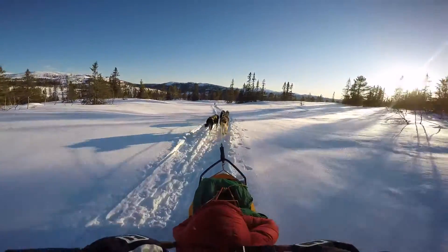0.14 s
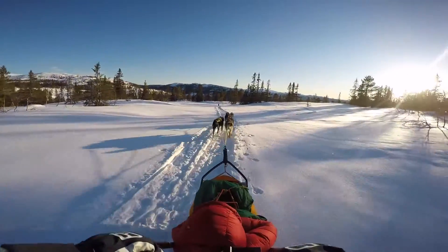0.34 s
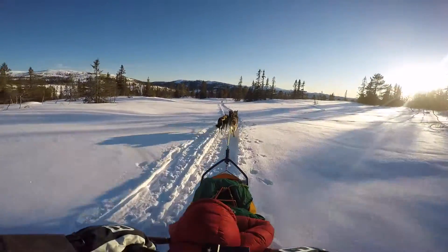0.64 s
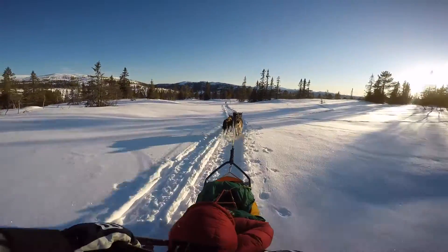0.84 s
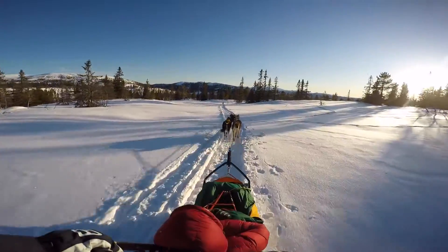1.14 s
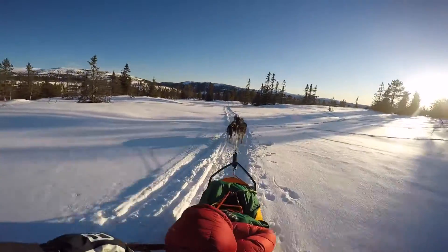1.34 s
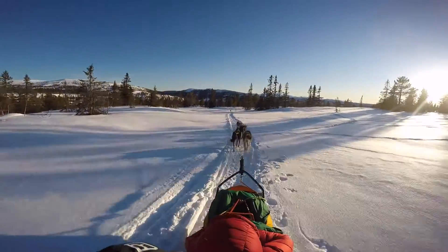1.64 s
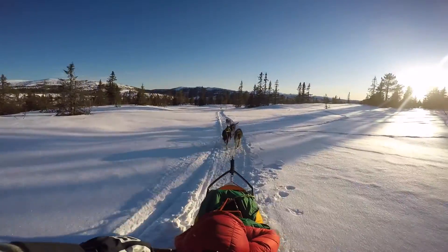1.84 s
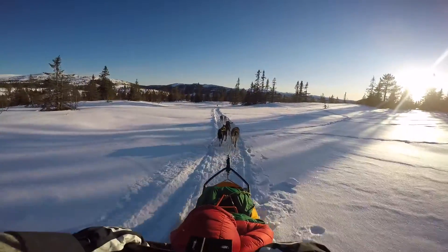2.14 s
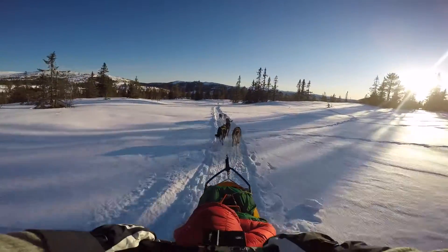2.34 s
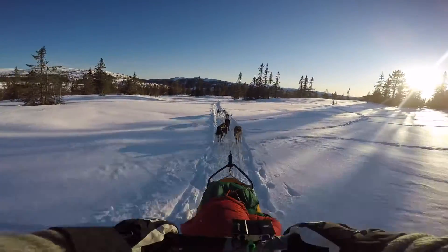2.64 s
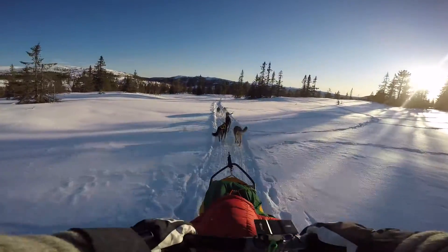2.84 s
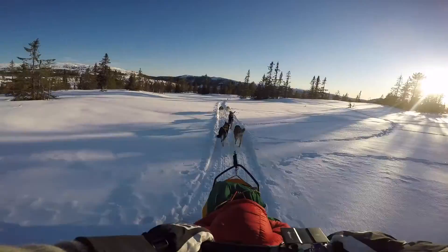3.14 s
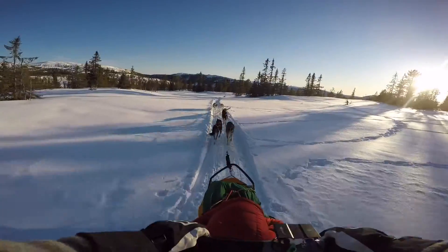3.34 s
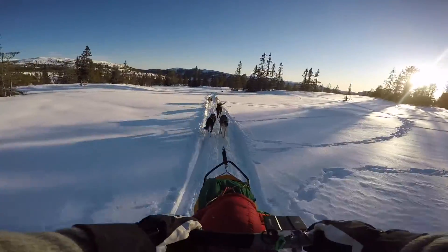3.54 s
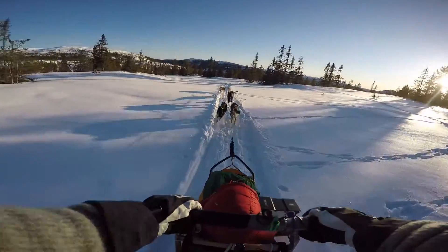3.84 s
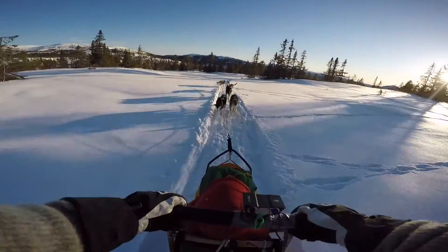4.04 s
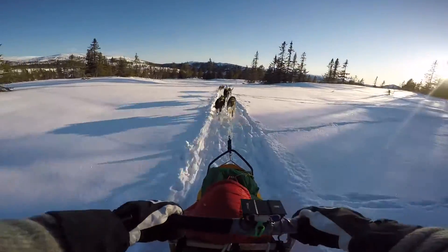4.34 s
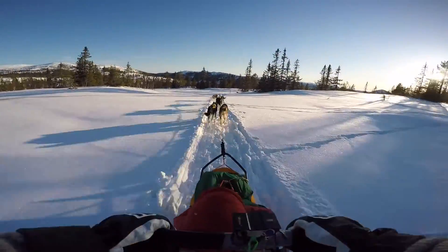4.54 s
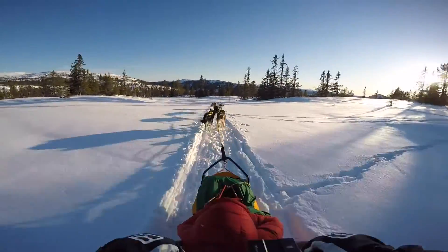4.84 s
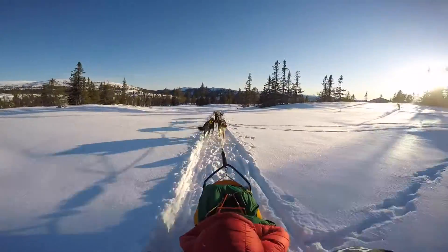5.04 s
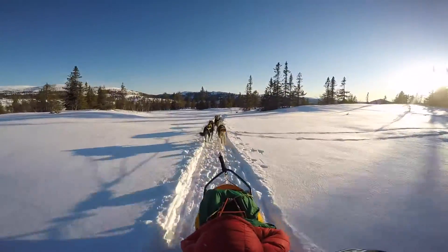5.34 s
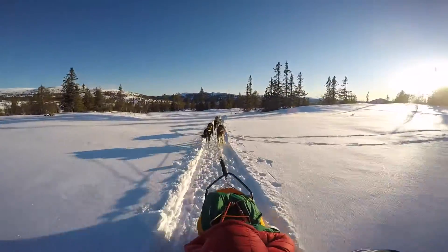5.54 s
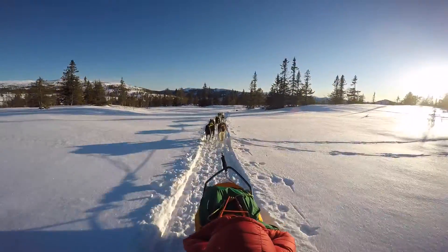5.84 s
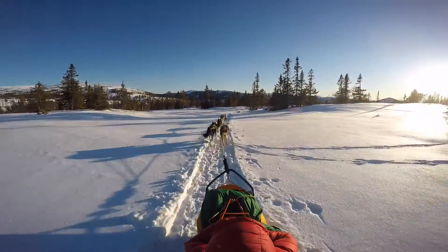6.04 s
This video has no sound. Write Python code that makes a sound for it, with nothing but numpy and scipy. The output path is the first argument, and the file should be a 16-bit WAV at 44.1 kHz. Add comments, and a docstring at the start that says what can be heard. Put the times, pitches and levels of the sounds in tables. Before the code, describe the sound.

Heard from a small camera carried by the driver, sled runners hiss and scrape over packed snow. Muffled crunches and low double knocks come irregularly as lumps pass underneath. The ride begins lightly, roughens near one second, eases, then turns densest and loudest between four and five seconds. The loaded basket booms, wooden joints tap and buckles tick. Wind rumbles low; the open snowfield gives no echo.

```python
"""Dog sled over packed snow

A sled glides over wind-packed snow, heard from a small camera carried by the driver. Filtered impulses make
the crumps of collapsing snow and the boom of the loaded basket; windowed cosines make the knocks on lumps.
Coloured grains and noise make the scrape, hiss, crust, dust and wind; damped sines make the gear's ticks
and the frame's taps; a thin electronic whine is made of unsteady sines."""
import sys
import numpy as np
from scipy import signal
from scipy.fft import rfft, irfft
from scipy.io import wavfile
from scipy.ndimage import uniform_filter1d

SR = 44100
rng = np.random.default_rng(int(sys.argv[2]) if len(sys.argv) > 2 else 0)


def master_out(mix):
    """Clip the mix to full scale and print it as 16-bit PCM to the path in sys.argv[1]."""
    frames = np.transpose(np.atleast_2d(mix))
    ceiling = np.clip(frames, -1, 1)
    pcm = np.round(ceiling * 32767).astype(np.int16)
    wavfile.write(sys.argv[1], SR, pcm)


N = 273861
TIME = np.arange(N) / SR
FREQS = np.fft.rfftfreq(N, 1 / SR)

# Work of the runners through the snow: (time [s], crump level [dB])
DRAG = [(0.0, -39), (0.3, -35), (0.76, -37.5), (0.95, -32.5), (1.11, -32), (1.3, -30.5), (1.55, -38),
        (2.05, -35.5), (2.3, -38), (2.62, -33.5), (3.13, -33.5), (3.42, -35), (3.85, -31.5), (4.05, -30),
        (4.35, -24.5), (4.8, -32), (5.21, -29.5), (5.46, -35), (5.62, -34.5), (5.95, -31.5), (6.21, -34.5)]
# Sliding contact, before trim: (time [s], coarse scrape level [dB], fine powder hiss level [dB])
GLIDE = [(0.0, -61, -54.5), (0.5, -57.5, -53.5), (0.75, -59.5, -53.5), (1.25, -55.5, -55.5),
         (1.55, -56, -58.5), (2.12, -56, -59.5), (2.3, -53.5, -59), (2.8, -55, -58), (3.2, -54.5, -60),
         (3.99, -50.5, -55), (4.2, -50, -58.5), (4.48, -50.5, -56.5), (4.74, -53, -55.5), (5.3, -53, -56.5),
         (5.8, -54, -56.5), (5.95, -53, -56.5), (6.21, -53.5, -57)]
# Wind at the microphone, before trim: (time [s], level [dB])
WIND = [(0.0, -34.5), (0.3, -45), (0.5, -37.5), (0.7, -33), (1.0, -45), (1.35, -38.5), (1.6, -38.5),
        (2.16, -46), (2.27, -33), (2.5, -36), (2.7, -32.5), (2.95, -43), (3.3, -38), (3.55, -35.5),
        (3.87, -41), (4.05, -34.5), (4.55, -44), (5.0, -41.5), (6.21, -40)]
# Boom of the basket over uneven ground, before trim: (time [s], level [dB])
SHAKE = [(0.0, -42), (0.86, -47.5), (1.05, -36), (1.3, -32), (1.54, -43.5), (2.08, -39), (2.27, -49),
         (2.42, -42), (2.75, -43.5), (3.1, -40.5), (3.6, -40.5), (3.85, -46), (4.15, -39.5), (4.79, -37.5),
         (5.12, -26), (5.46, -39), (5.76, -36.5), (6.21, -43)]
# Finest blown snow, strongest early on: (time [s], level [dB])
DUST = [(0.0, -55), (0.5, -56), (0.75, -53), (1.25, -55), (1.8, -61), (2.1, -77), (2.6, -69), (3.2, -74),
        (6.21, -85)]

# Larger lumps under the runners: (time [s], level before trim [dB], pitch [Hz],
# time to cross [s], knock off relative to knock on [dB])
LUMPS = [(0.2484, -20.5, 363, 0.0061, -8), (0.3541, -31, 342, 0.007, -18), (0.425, -19.5, 207, 0.0071, -11),
         (0.4642, -23, 237, 0.0093, -10), (0.8343, -25.5, 199, 0.011, -13), (0.9312, -19, 373, 0.012, -7),
         (0.9751, -13, 260, 0.025, 0.5), (1.1198, -15.5, 288, 0.0128, 1.5), (1.2301, -10, 300, .0065, -3),
         (1.314, -12.5, 275, 0.0052, -9), (1.344, -10.5, 312, 0.024, -3), (1.4071, -17, 287, 0.022, 1.5),
         (1.4852, -23, 274, .013, -4), (1.6473, -22.5, 245, 0.0034, -12), (1.8463, -21, 322, 0.0055, -11),
         (1.9436, -15.5, 313, 0.054, -3), (2.0377, -16.5, 297, 0.023, -1), (2.073, -23, 260, 0.0058, -6),
         (2.3, -16.5, 310, 0.006, -20), (2.561, -19, 330, 0.034, -2.5), (2.607, -18.5, 317, 0.017, 2),
         (2.7139, -24, 273, 0.012, 3.5), (2.9216, -17.5, 302, 0.011, 1.5),
         (3.2506, -14.5, 213, 0.0092, -10), (3.2872, -17.5, 242, .011, 0.5), (3.4, -24.5, 430, 0.0053, 3),
         (3.5007, -18.5, 337, 0.023, -3), (3.6244, -19, 342, .0147, 2.5), (3.9227, -18, 390, .0088, 3),
         (4.0281, -8.5, 318, 0.0079, 0.5), (4.0452, -12.5, 296, 0.0069, -3), (4.0686, -9, 322, 0.015, -0.5),
         (4.0978, -13, 300, 0.0042, -22), (4.126, -20.5, 335, 0.0088, 2), (4.1908, -11.5, 314, 0.0076, 2.5),
         (4.2596, -7.5, 308, .0102, -3), (4.2986, -11.5, 316, 0.0032, -2), (4.3383, -17, 342, 0.031, 3),
         (4.3941, -5.5, 290, .011, -7), (4.417, -6, 326, 0.0122, -6), (4.4785, -11, 320, 0.021, -6),
         (4.5428, -21, 420, 0.0057, -8), (4.5966, -14.5, 275, .0204, 2), (4.6481, -14.5, 374, .006, -4),
         (4.6948, -14, 343, 0.017, 4.5), (4.7482, -16.5, 294, .007, -15), (4.8586, -19, 163, 0.0045, -17),
         (4.8945, -6.5, 268, 0.037, -8.5), (4.964, -12.5, 265, 0.02, 4), (5.0956, -15.5, 243, 0.036, 0),
         (5.1943, -14, 315, 0.023, -3.5), (5.2593, -25, 187, 0.0027, -2), (5.301, -13, 212, 0.0113, -5),
         (5.372, -20, 494, 0.006, -14), (5.518, -17.5, 262, 0.0089, -0.5),
         (5.6242, -10.5, 297, 0.0055, -12), (5.6493, -9, 276, 0.018, 2.5), (5.6969, -10, 284, 0.0031, -24),
         (5.775, -15, 214, 0.0047, -11), (5.8703, -16, 370, 0.029, -2.5), (5.9526, -17, 367, .009, -6),
         (6.079, -15, 320, 0.005, -18)]
# Ticks of buckles and frame: (time [s], level over the first 5 ms [dB], emphasised ring [Hz],
# pitch ratio of the modes [1], crack relative to ring [dB], upper edge of the treble [Hz])
TICKS = [(.409, -43, 1650, 0.77, -5, 3300), (0.422, -47, 2000, 0.75, -2, 4000),
         (1.26, -38.5, 1500, 0.94, -6, 6000), (1.592, -44.5, 2200, 0.86, -4, 3800),
         (1.722, -40, 1350, 1.03, -4, 2200), (2.812, -34, 3270, 1.04, -8, 14000),
         (3.983, -41, 1500, 0.81, -9, 3000), (4.038, -45, 1600, 1, -3, 2800),
         (4.05, -39, 3000, 1, -1, 5200), (4.0777, -37, 4230, 1.1, -11, 14000),
         (4.121, -45, 1500, .95, -8, 2400), (4.3991, -28.5, 3370, 0.99, -9, 4600),
         (4.7034, -27, 2300, 0.98, -12, 8800), (4.885, -39, 3460, 0.92, -2, 5000),
         (5.302, -43.5, 2000, 0.9, -7, 3600), (5.46, -42, 1890, 0.78, -6, 3200),
         (5.642, -44.5, 2500, 1.3, 0, 3800), (5.657, -42.5, 2500, 0.99, -10, 3800),
         (5.7757, -33, 4400, 0.99, -10, 14000)]
# Hollow taps of the wooden frame: (time [s], peak level [dB], pitch [Hz])
TAPS = [(0.928, -30.5, 1020), (1.4985, -32, 850), (1.7222, -17, 883), (2.2068, -25, 570),
        (2.8122, -24.5, 720), (4.397, -30, 1070), (4.7037, -14.5, 680), (5.617, -30, 1050),
        (5.776, -29, 725)]
# Patches of brightly scraping icy crust: (time [s], half length [s], level [dB], centre [Hz])
CRUSTS = [(1.25, 0.074, -52, 4070), (1.417, .02, -51, 4400), (1.827, 0.046, -54, 2660),
          (2.29, .02, -52, 3400), (2.582, 0.017, -53, 2300), (3.75, .035, -48.5, 3860),
          (3.957, 0.014, -47, 4300), (4.336, .01, -48, 3200), (4.392, 0.0059, -41, 3000),
          (4.694, .004, -43, 1700), (4.904, .02, -50, 3880), (5.214, 0.025, -50, 3670),
          (5.372, 0.028, -49.5, 2700)]

# Modes of the gear, before pitch ratio and emphasis: (frequency [Hz], t60 [s], level [dB])
GEAR_MODES = [(1560, 0.0085, 6), (1850, 0.013, 4.5), (2446, 0.011, 7.5), (3420, 0.0085, 5),
              (4040, 0.019, 0.5), (4840, 0.013, 1), (6200, 0.0064, 1), (7000, 0.0064, -13),
              (8900, .007, -9), (12800, .004, -10)]
# Shudder of the frame after a knock: (frequency [Hz], t60 [s], level [dB])
FRAME_MODES = [(259.5, 0.062, -6.5), (394, 0.046, -8.5)]
# Resonances of the runners that the scrape excites: (frequency [Hz], t60 [s])
RUNNER_MODES = [(1700, 0.0019), (2400, 0.012), (3500, 0.0037), (4700, 0.0013)]
# Whine of the camera: (frequency [Hz], width, twice the rms wander [Hz], rms level [dB])
WHINE = [(6294, 5, -74), (6324, 10, -76), (12618, 8, -78.5)]

# Spectrum of collapsing snow: (frequency [Hz], relative level [dB])
CRUMP_COLOUR = [(90, -8.5), (160, -7.5), (210, 1), (260, 0), (390, -0.5), (490, -4), (730, -5),
                (860, -13.5), (1050, -22), (1400, -40.5), (3000, -67)]
# Spectrum of the coarse scrape: (frequency [Hz], relative level [dB])
SCRAPE_COLOUR = [(600, 3), (1200, 0.5), (1800, -1.5), (2400, -0.5), (3000, -3.5), (3500, -1), (5000, -12.5),
                 (6000, -14), (7000, -18), (9500, -32), (11000, -37), (16000, -50)]
# Spectrum of the powder hiss: (frequency [Hz], relative level [dB])
POWDER_COLOUR = [(1500, 3), (3000, 6), (4500, 10), (6000, 4.5), (7000, -1.5), (9500, -0.5), (10600, -3),
                 (12000, -5), (13000, -0.5), (15500, -5.5)]
# Spectrum of wind pressure: (frequency [Hz], relative level [dB])
WIND_COLOUR = [(10, -12.5), (22, -8.5), (35, 0.5), (60, -2.5), (85, -12), (150, -23.5), (400, -30.5),
               (1500, -56)]
# Spectrum of the basket's boom: (frequency [Hz], relative level [dB])
BOOM_COLOUR = [(40, -31), (75, -1), (110, 1.5), (165, 1.5), (220, -9), (320, -13), (1000, -66)]
# Spectrum of the finest dust: (frequency [Hz], relative level [dB])
DUST_COLOUR = [(10500, -40), (12000, 0), (13200, -4), (15400, -3)]

TOP_HZ = 15400  # upper edge of the camera's band
EASY_DRAG_DB = -35  # drag of an easy glide
LUMP_ATTACK_S, LUMP_RELEASE_S = 0.0014, 0.0095  # how fast the load on the snow builds and eases at a knock
LUMP_HZ = 277  # pitch of an average lump's knock


def undb(db):
    """Logarithmic level: decibels to amplitude gain."""
    return 10 ** (np.asarray(db) / 20)


def unit(x):
    """Normalisation: scale to rms 1."""
    return x / np.sqrt(np.mean(x ** 2))


def curves(table):
    """Linear interpolation: the columns of a table, joined by straight lines in time."""
    s, *columns = np.transpose(table)
    return [np.interp(TIME, s, column) for column in columns]


def colour(x, points):
    """Spectral shaping: filter by (Hz, dB) points joined over log frequency; rms 1."""
    hz, db = np.transpose(points)
    gain = undb(np.interp(np.log(FREQS + 1), np.log(hz), db))
    return unit(irfft(rfft(x) * gain, N))


def walk(rate):
    """Low-passed noise: a smooth random curve of rms 1 with bandwidth rate [Hz]."""
    noise = rng.standard_normal(N)
    return unit(irfft(rfft(noise) * np.exp(-(FREQS / rate) ** 2), N))


def grains(rate, spread_db):
    """Random impulse process: one-sided impulses, rate a second, with exponentially spread levels."""
    chance = rng.random(N)
    size = np.minimum(rng.exponential(1, N), np.pi)
    return (chance < rate / SR) * undb(spread_db * size)


def add(out, at, sound):
    """Superposition: mix a sound in from time at."""
    start = max(int(at * SR), 0)
    out[start:start + len(sound)] += sound[:N - start]


def decay(t, t60):
    """Exponential damping: a fall of 60 dB in t60."""
    return np.exp(-np.log(1000) * t / t60)


def ring(x, hz, t60):
    """Damped resonance: a two-pole filter with gain near 1 at its centre."""
    r = decay(1 / SR, t60)
    return signal.lfilter([1 - r, 0, r - 1], [1, -2 * r * np.cos(2 * np.pi * hz / SR), r * r], x)


def knocks():
    """Paired contacts: each lump gives a knock onto it and one off it, as (s, dB, Hz)."""
    pairs = []
    for at, db, hz, length, drop_db in LUMPS:
        pairs += [(at, db, hz), (at + length, db + drop_db, hz)]
    return pairs


def lump_load(soft=0):
    """Transient loading: attack and release at each knock; positive soft favours low-pitched lumps."""
    load, t = np.zeros(N), np.arange(SR // 10) / SR
    release = np.exp(-np.maximum(t - LUMP_ATTACK_S, 0) / LUMP_RELEASE_S)
    swell = np.minimum(t / LUMP_ATTACK_S, 1) * release
    for at, db, hz in knocks():
        add(load, at - LUMP_ATTACK_S, undb(db) * (LUMP_HZ / hz) ** soft * swell)
    return load


def crumps(drag_db, cluster_db=2.0, lump_db=-18.0):
    """Stepwise collapse: packed snow yields under load in clustered steps, more at high-pitched lumps."""
    steps = grains(rate=1500, spread_db=2.5) * np.sign(rng.standard_normal(N))
    strength = np.hypot(undb(drag_db), undb(lump_db) * lump_load(soft=-2.05))
    return colour(steps, CRUMP_COLOUR) * strength * undb(cluster_db * walk(rate=38))


def thud(hz, t, rise_cycles=0.7, fall_cycles=0.53, lean=0.48):
    """Damped impact: a cosine with phase lean [rad], a Gaussian rise and a slower fall."""
    rise = np.exp(-(hz * t / rise_cycles) ** 2)
    fall = 1 / np.cosh(hz * t / fall_cycles)
    return np.cos(2 * np.pi * hz * t + lean) * np.where(t < 0, rise, fall)


def bumps(drag_db, trim_db=-3.0, small_db=-35, roughen=1.4):
    """Impact and resonance: runners knock on and off lumps, random small ones too; the frame shudders."""
    reach = 0.02  # s, either side of the knock
    t = np.arange(-reach, reach, 1 / SR)
    # small lumps grow quickly with the drag
    small = grains(rate=55, spread_db=-2.0) * undb(small_db + roughen * (drag_db - EASY_DRAG_DB))
    out = signal.fftconvolve(small, thud(LUMP_HZ, t), "same")
    for at, db, hz in knocks():
        add(out, at - reach, undb(db + trim_db) * thud(hz, t))
    shudder = sum(undb(db) * ring(out, hz, t60) for hz, t60, db in FRAME_MODES)
    return out + shudder


def basket(trim_db=1.45, lump_db=-20, jolt_db=3.0):
    """Forced vibration: small jolts make the loaded basket boom, most of all at low-pitched lumps."""
    shake_db, = curves(SHAKE)
    strength = np.hypot(undb(shake_db + trim_db), undb(lump_db) * lump_load(soft=4.3))
    jolts = grains(rate=550, spread_db=2.5) * np.sign(rng.standard_normal(N))
    return colour(jolts, BOOM_COLOUR) * strength * undb(jolt_db * walk(rate=42))


def runners(rumble):
    """Sliding friction: ice crystals scrape harder as the rumble swells; loose powder hisses above."""
    scrape_db, powder_db = curves(GLIDE)
    scrape_trim_db, powder_trim_db = 5.36, 5.07
    grip = 0.18  # exponent of scrape against pressure
    shift_db, patchy_db = 1.6, 0.68  # rms wander of each resonance and of the whole

    # pressure: rumble power over 9 ms against that over 0.27 s
    brief = np.abs(uniform_filter1d(rumble ** 2, size=400))
    lasting = np.abs(uniform_filter1d(rumble ** 2, size=12000))
    pressure = unit(np.sqrt(brief / lasting))

    crystals = colour(grains(rate=3500, spread_db=-1.5) * rng.standard_normal(N), SCRAPE_COLOUR)
    # the contact patch wanders, so each resonance of the runners swells and fades by itself
    rasp = crystals.copy()
    for hz, t60 in RUNNER_MODES:
        rasp += (undb(shift_db * walk(rate=14.5)) - 1) * ring(crystals, hz, t60)
    scrape = unit(rasp) * pressure ** grip * undb(scrape_db + scrape_trim_db)
    powder = colour(rng.standard_normal(N), POWDER_COLOUR) * undb(powder_db + powder_trim_db)
    return (scrape + powder) * undb(patchy_db * walk(rate=23))


def dust(flutter_db=2.0):
    """Band-limited noise: fine blown snow sizzles thinly above the hiss of the runners."""
    dust_db, = curves(DUST)
    return colour(rng.standard_normal(N), DUST_COLOUR) * undb(dust_db + flutter_db * walk(rate=14))


def wind(trim_db=1.2, eddy_db=3.0):
    """Turbulent pressure: eddies push on the microphone port as low, wandering noise."""
    gust_db, = curves(WIND)
    level_db = gust_db + trim_db + eddy_db * walk(rate=3.5)
    return colour(rng.standard_normal(N), WIND_COLOUR) * undb(level_db)


def whine():
    """Frequency modulation: the camera's electronics give thin, slightly unsteady tones."""
    out = np.zeros(N)
    for hz, width, db in WHINE:
        unsteady_hz = hz + width / 2 * walk(rate=8.3)
        out += undb(db) * unit(np.sin(2 * np.pi * np.cumsum(unsteady_hz) / SR))
    return out


def ticks(crack_s=0.0015, focus_db=7.5, focus_octaves=0.25, scuff_s=0.001193, scuff_db=-10.5):
    """Modal excitation: hard gear scuffs, then snaps together; the spot struck favours nearby modes."""
    out, t = np.zeros(N), np.arange(SR // 20) / SR
    hz, t60, mode_db = np.transpose(GEAR_MODES)
    first = t < 0.005
    sign = (-1) ** np.arange(len(hz))  # neighbouring modes swing opposite ways
    high_pass = signal.butter(2, 950, "high", fs=SR)
    for at, db, spot_hz, ratio, crack_db, edge_hz in TICKS:
        mode_hz = hz * ratio
        rings = sign * np.sin(2 * np.pi * np.outer(t, mode_hz)) * decay(t[:, None], t60)
        focus = np.exp(-(np.log2(mode_hz / spot_hz) / focus_octaves) ** 2)
        body = rings @ undb(mode_db + focus_db * focus)
        # two independent noise bursts: one for the crack, one for the scuff
        grit = signal.lfilter(*high_pass, rng.standard_normal((2, len(t))) * np.exp(-t / crack_s))
        low_pass = signal.butter(3, min(edge_hz, TOP_HZ), fs=SR)
        body, crack, scuff = (unit(signal.lfilter(*low_pass, part)) for part in (body, *grit))
        tick = body + undb(crack_db) * crack
        gain = undb(db) / tick[first].std()
        add(out, at, gain * tick)
        add(out, at - scuff_s, gain * undb(scuff_db) * scuff)
    return out


def taps(t60=0.013, contact_s=0.0011):
    """Soft contact: a joint of the frame rings as one sine with a rounded onset and a quick decay."""
    out, t = np.zeros(N), np.arange(SR // 20) / SR
    swell = (1 - np.exp(-(t / contact_s) ** 2)) * decay(t, t60)
    for at, db, hz in TAPS:
        add(out, at, undb(db) * np.sin(2 * np.pi * hz * t) * swell / swell.max())
    return out


def crust(t60=0.0017):
    """Brittle fracture: crystals break under a runner in brief, gritty, resonant swishes."""
    grit = grains(rate=3000, spread_db=0.0) * rng.standard_normal(N)
    out = np.zeros(N)
    for at, length, db, hz in CRUSTS:
        swish = unit(ring(ring(grit, hz, t60), hz, t60 / 2))
        out += swish * undb(db) * np.exp(-((TIME - at) / length) ** 2)
    return out


def scene():
    """Free field: open snow gives no echo, so the sources simply add and arrive dry."""
    drag_db, = curves(DRAG)
    rumble = crumps(drag_db) + bumps(drag_db)
    sliding = runners(rumble) + crust() + dust()
    gear = basket() + ticks() + taps()
    return (rumble + sliding + gear + wind() + whine())[None]


def record(dry):
    """Band limiting: the camera cuts the top with a steep elliptic low-pass."""
    low_pass = signal.ellip(10, 0.2, 70, TOP_HZ, fs=SR, output="sos")
    return signal.sosfilt(low_pass, dry)


dry = scene()
out = record(dry)
master_out(out)
```